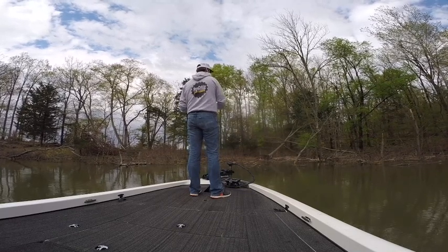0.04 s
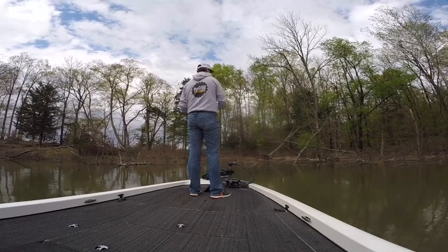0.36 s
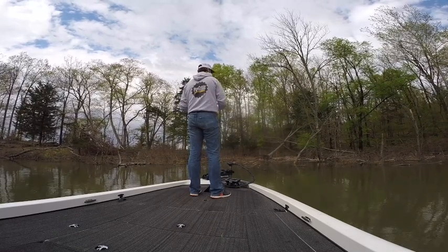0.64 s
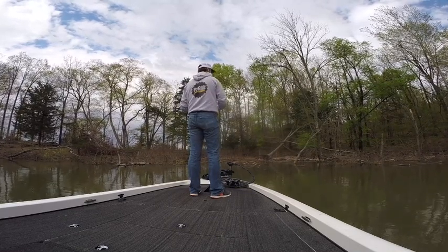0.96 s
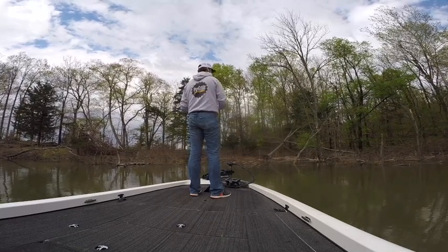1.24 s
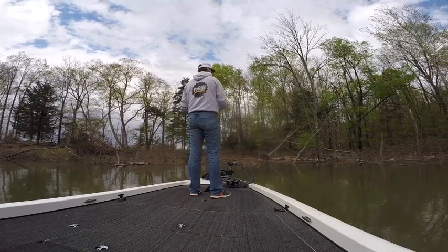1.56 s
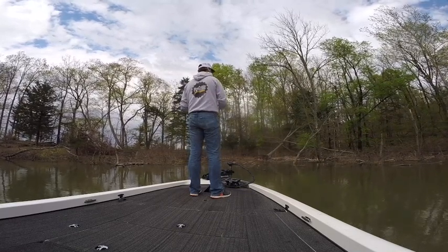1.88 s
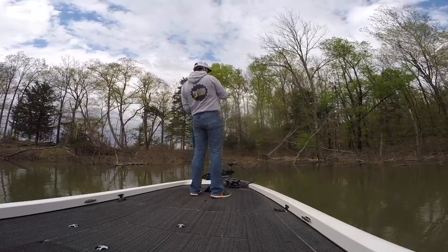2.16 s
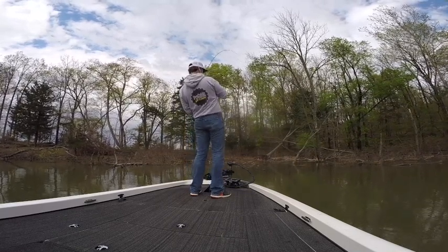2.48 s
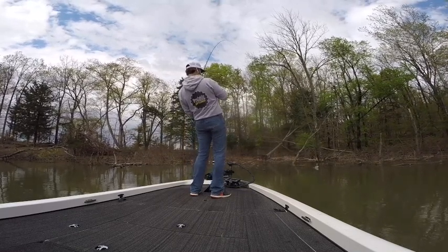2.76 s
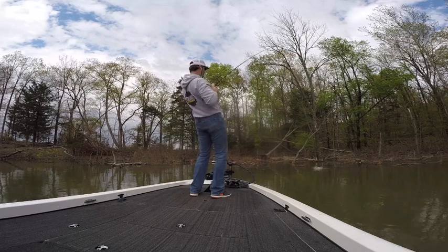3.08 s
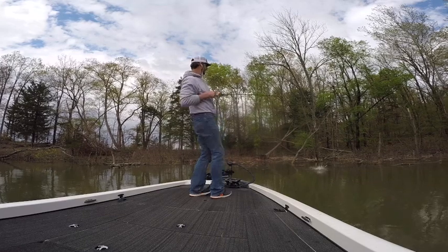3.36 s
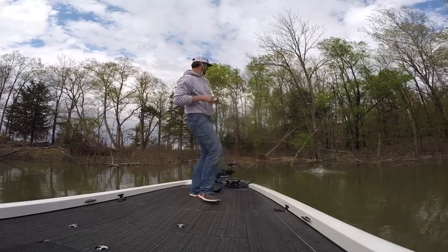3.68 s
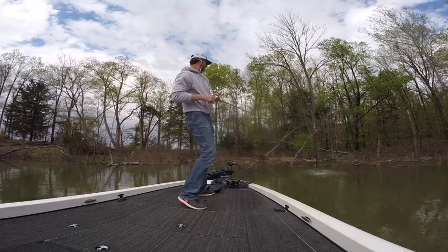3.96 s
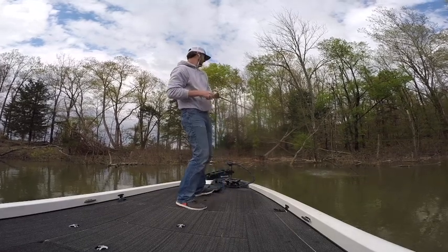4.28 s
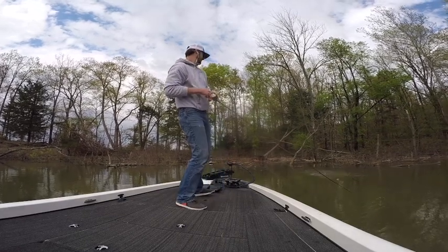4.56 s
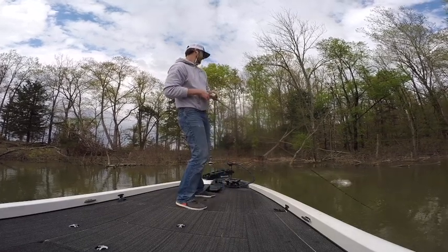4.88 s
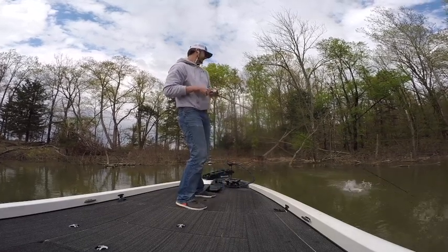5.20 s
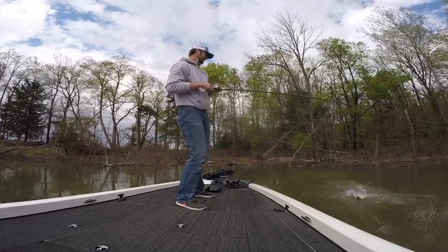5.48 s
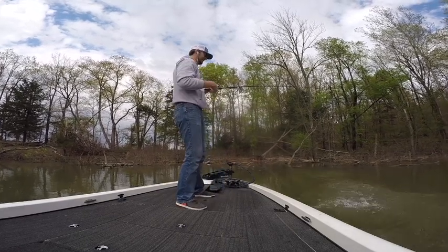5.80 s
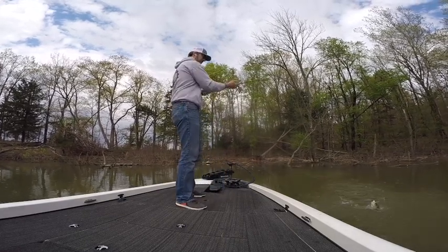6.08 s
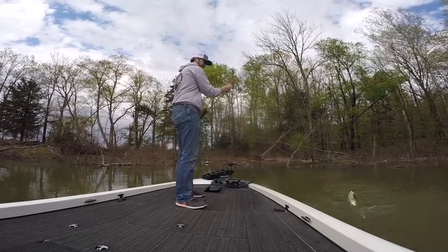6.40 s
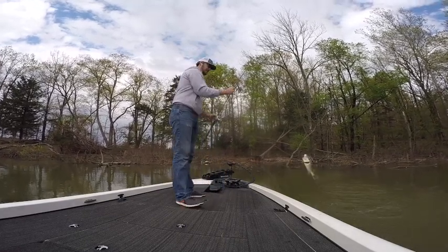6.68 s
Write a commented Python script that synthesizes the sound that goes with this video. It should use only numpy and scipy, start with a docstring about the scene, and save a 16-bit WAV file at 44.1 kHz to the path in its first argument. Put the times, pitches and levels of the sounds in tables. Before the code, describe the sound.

On a quiet lake, wind buffets the microphone with a big low thump and a fading rumble. A bird gives a few faint whistles and another chips raspily. A fishing line zips briefly, then a hooked fish splashes, first farther off and then louder beside the boat. Tackle ticks and rings thinly throughout the fight, and is sharpest at the end as the fish comes out dripping.

```python
"""A hooked fish thrashes on a calm lake in two spells, far off and then beside the boat, and is swung
out dripping. Its impacts on the water radiate broadband noise, and the air they trap rings as bubbles.
The line zips tight and the tackle ticks and rings in thin, high modes. Wind buffets the microphone
with a low rumble and one big thump, and feet thud on the deck. On the wooded shore, which returns
faint echoes of the water, one bird whistles and another gives raspy chips."""
import sys
import numpy as np
from scipy import signal
from scipy.fft import rfft, irfft, next_fast_len
from scipy.io import wavfile
from scipy.ndimage import uniform_filter1d

SR = 44100
rng = np.random.default_rng(int(sys.argv[2]) if len(sys.argv) > 2 else 0)


def generate_wav(signal):
    """Clip the signal to [-1, 1] and save it as 16-bit WAV at the path in sys.argv[1]."""
    frames = np.transpose(np.atleast_2d(signal))
    scaled = np.clip(frames, -1, 1) * 32767
    pcm = np.round(scaled).astype(np.int16)
    wavfile.write(sys.argv[1], SR, pcm)


N = 305921
TIME = np.arange(N) / SR

# wind turbulence at the microphone: frequency_hz, density_db
WIND_SPECTRUM = [(14, -12), (22, -1), (32, 1.5), (50, -3.5), (85, -13), (112, -22.5), (165, -37.5),
                 (200, -40), (250, -54), (500, -53.5), (1100, -74)]
# gusts: start_s, hold_s, level_db
GUSTS = [(0.168, 0.058, -15), (0.432, 0.082, -26.5), (0.857, 0.012, -24.5), (0.983, 0.058, -22.5),
         (1.238, 0.11, -24.5), (1.451, 0.17, -29), (2.239, 0.011, -34), (2.825, 0.28, -31.5),
         (3.23, 0.74, -41), (4.374, 0.015, -38.5), (4.55, 0.25, -42.5), (5.66, 0.029, -33.5),
         (5.883, 0.023, -35), (6.34, 0.72, -40.5)]
# rumble around the hull: frequency_hz, density_db
HULL_SPECTRUM = [(40, -9), (60, -7.5), (82, 4), (120, -8), (175, -13), (240, -28.5), (400, -33)]
# air in the trees: frequency_hz, density_db; then its overall level
TREE_SPECTRUM, TREE_DB = [(150, -29), (250, 2.5), (308, -2.5), (624, -7.5), (2160, -11), (2760, -13),
                          (3010, -11.5), (6310, -16.5), (15500, -25.5)], -59
# thumps of wind and of feet on the deck: start_s, level_db, pitch_hz, length_s
THUMPS = [(0.189, -4.5, 32.4, 0.14), (0.18, -16.5, 75.5, 0.043), (0.257, -13, 111, 0.025),
          (0.253, -30.5, 196, 0.038), (1.19, -39, 130, .05), (0.3, -4.5, 70, 0.03),
          (1.279, -15.5, 55, 0.05), (1.68, -18.5, 39, 0.072), (2.925, -27.5, 74, 0.092),
          (3.058, -17.5, 41.5, 0.097), (3.539, -32, 69.6, 0.11), (3.887, -26.5, 117, 0.026),
          (3.898, -28, 54.6, 0.029), (5.702, -32, 82, 0.09)]
# one bird's raspy chips: start_s, length_s, pitch_hz, level_db
BIRD_CHIPS = [(1.385, .04, 7300, -65), (2.049, 0.027, 6360, -55.5), (2.051, 0.051, 4900, -59)]
# the other bird's whistles: start_s, length_s, top_hz, level_db
BIRD_NOTES = [(1.6, 0.1, 2580, -63), (1.79, 0.11, 2830, -53.5), (2.003, 0.11, 2840, -52.5),
              (2.224, 0.1, 2824, -52.5), (2.437, 0.11, 2840, -53.5)]
# glide of the tightening line: time_s, pitch_hz, level_db
LINE_GLIDE = [(2.7, 4300, -59), (2.71, 5800, -52), (2.72, 6600, -51), (2.75, 6770, -67), (2.8, 6700, -65)]
# bouts of thrashing: start_s, rise_s, hold_s, t60_s, splash_db, churn_re_splash_db, spray_re_splash_db
BOUTS = [(2.787, 0.018, 0.35, 0.72, -50, -7, -9.5), (2.9, 0.38, .2, 1.0, -41.5, -6, -8),
         (3.544, 0.091, 0.37, 1, -44, -7, -8), (4.634, 0.094, 0.26, .8, -49, -14.5, -7.5),
         (4.828, .12, 0.49, 1.04, -39, -12.5, -4), (5.553, 0.046, 0.26, 0.74, -41.5, -5, -3),
         (6.076, 0.033, .08, 0.84, -45.5, -20, -10)]
# torn water: frequency_hz, density_db
SPLASH_SPECTRUM = [(82, -34), (140, -4), (200, -0.5), (243, -8), (456, -2), (747, -13), (1040, 3.5),
                   (1500, 0), (1900, 5.5), (2580, -3.5), (3500, -5.5), (5040, -12), (14600, -28),
                   (15500, -36)]
# body and tail strike the water: start_s, snap_db, cavity_hz, treble_db
SLAPS = [(2.798, -38.5, 1150, 0), (3.013, -29, 1940, -10), (3.076, -34, 1090, 11.5),
         (3.122, -30.5, 1180, 6), (3.241, -31, 1127, 12), (3.254, -25, 2180, 10.5),
         (3.406, -23.5, 1760, -15), (3.421, -22.5, 1100, -21), (3.55, -27.5, 2850, 13),
         (3.629, -25.5, 970, 3), (3.768, -30.5, 1040, 3), (3.786, -20, 1800, -18), (4.885, -25, 2130, 6.5),
         (4.957, -22, 1810, 6), (4.977, -18.5, 2080, -3), (5.003, -18.5, 1910, -15), (5.104, -22, 3100, 6),
         (5.146, -22.5, 1970, 10), (5.205, -18.5, 1260, 7), (5.264, -23.5, 2120, 0), (5.278, -20, 1480, 9),
         (5.332, -14.5, 2000, 0), (5.351, -30, 2990, 5), (5.442, -19.5, 1670, -10), (5.454, -23, 2000, -2),
         (5.481, -26, 2030, -15), (5.615, -21.5, 2380, 9), (5.649, -25.5, 2130, -9),
         (5.739, -24, 2420, 7.5), (5.832, -26.5, 1110, -10), (5.845, -22.5, 1050, -1),
         (6.167, -30, 1200, -8)]
# large air pockets: start_s, level_db, pitch_hz
AIR_POCKETS = [(2.852, -36, 500), (3.148, -29, 820), (3.271, -28, 326), (3.295, -27, 530),
               (3.338, -28, 430), (3.482, -25, 487), (3.691, -27.5, 454), (3.761, -30.5, 306),
               (3.861, -28.5, 614), (3.888, -24.5, 427), (3.909, -27, 313), (3.943, -33, 400),
               (4.536, -42, 394), (4.989, -24, 592), (5.109, -31, 428), (5.391, -23.5, 970),
               (5.404, -30, 354), (5.491, -30.5, 560), (5.653, -33, 470), (5.709, -29.5, 352),
               (5.833, -28.5, 437), (5.855, -26.5, 500), (5.989, -42, 316), (6.166, -29.5, 850),
               (6.281, -39, 424), (6.408, -38.5, 343), (6.496, -38, 756), (6.582, -34, 335)]
# single falling drops: start_s, level_db, nominal_hz
DRIPS = [(3.5752, -31, 2130), (4.133, -42, 5300), (4.181, -42, 4400), (4.217, -42.5, 3530),
         (4.711, -37, 1460), (5.4031, -27, 1610), (6.091, -40, 1570), (6.117, -35, 2680),
         (6.146, -38.5, 1157), (6.2213, -40, 1720), (6.2398, -43, 1035), (6.367, -39, 2700),
         (6.3798, -37.5, 2500)]
# ticks of the tackle: start_s, click_db, low_ring_db, middle_ring_db, high_ring_db, t60_s
TACKLE_TICKS = [(2.8546, -25, -35.5, -39, -50, 0.1), (2.9104, -24, -38.5, -50, -48, 0.42),
                (3.251, -26, -45, -51, -50, 0.16), (3.3436, -32, -36, -46, -45, 0.14),
                (3.5503, -8.5, -26, -37, -43, 0.031), (4.287, -32, -66, -62, -61, .15),
                (4.663, -28.5, -67, -42.5, -52, 0.1), (4.7294, -25, -30, -29.5, -35, 0.16),
                (4.879, -20, -32.5, -36, -41, 0.22), (5.145, -10, -47, -46, -43, 0.45),
                (5.295, -32, -50, -41, -51, 0.15), (5.3335, -12, -38, -37, -37, 0.15),
                (5.48, -32, -41, -34.5, -39, 0.1), (5.5157, -31, -40, -42.5, -47, 0.24),
                (6.191, -26, -49, -44.5, -47, 0.28), (6.256, -33, -41.5, -47, -60, 0.55),
                (6.293, -30, -56, -47, -54, 0.19), (6.353, -24.5, -52, -56, -57, 0.25),
                (6.47, -38, -65, -64, -53, 0.15), (6.4988, -32, -60, -39.5, -58, 0.17),
                (6.601, -37, -62, -49.5, -49, 0.63), (6.6497, -8, -22, -19, -22, 0.2),
                (6.694, -29, -47, -29, -37, 0.094), (6.7052, -19, -45, -23.5, -34, 0.064),
                (6.7336, -18, -42, -17.5, -22, 0.1), (6.7807, -9, -16.5, -28, -27, 0.29),
                (6.8117, -15, -24.5, -36, -38, 0.34), (6.9246, -35, -36, -40, -29.5, .16)]
# normal modes of the tackle: pitch_hz, level_db, t60_ratio
TACKLE_MODES = [(5370, -14, .45), (6520, -16, .4), (6715, 0, 1.2), (6810, -14, 1.2), (7760, -19, .7),
                (9560, -8, .6), (9800, 0, .7), (9900, -11, .6), (13000, -2, .7), (13620, -10, .6),
                (14050, -10, .6), (14350, -6, .5)]
# drops landing on the lake: frequency_hz, band_level_db
PATTER_SPECTRUM = [(400, -9.5), (1000, 0.5), (2500, 3.5), (5000, 10.5), (9000, -8), (15000, -9)]
# reflections from the shore: delay_s, gain_db
SHORE_ECHOES = [(.075, -21), (.17, -22)]

BREEZE_DB = -43.5   # wind strength in a lull
RING_CENTRES_HZ = (6740, 9800, 13500)   # the tackle's low, middle and high ring


def from_db(db):
    """Amplitude grows tenfold every 20 dB."""
    return 10 ** (np.asarray(db) / 20)


def rms_one(x):
    """Normalisation to unit mean power."""
    return x / np.sqrt(np.mean(x ** 2) + 1e-20)


def at_hz(points, hz):
    """Interpolation of a spectrum on a log-frequency axis."""
    f, db = np.transpose(points)
    return np.interp(np.log(hz), np.log(f), db)


def band(x, low_hz, high_hz):
    """A Butterworth band-pass with gentle slopes."""
    sos = signal.butter(2, [low_hz, min(high_hz, .45 * SR)], "band", fs=SR, output="sos")
    return signal.sosfilt(sos, x + 1e-18)


def drift(rate_hz):
    """Low-passed noise wanders smoothly, with rms 1."""
    step, run_in = 40, 2000
    pole = np.exp(-2 * np.pi * step * rate_hz / SR)
    white = rng.standard_normal(N // step + run_in + 2)
    slow = signal.lfilter([1], [1, -2 * pole, pole * pole], white)[run_in:]
    return np.interp(np.arange(N) / step, np.arange(len(slow)), rms_one(slow))


def coloured_noise(spectrum):
    """Spectral weighting colours white noise; the result has rms 1."""
    size = next_fast_len(N)
    hz = np.maximum(np.fft.rfftfreq(size, 1 / SR), 1)
    inside = (hz >= spectrum[0][0]) & (hz <= spectrum[-1][0])
    weights = from_db(at_hz(spectrum, hz)) * inside
    return rms_one(irfft(rfft(rng.standard_normal(size)) * weights, size)[:N])


def add(out, start_s, sound):
    """Superposition: a sound sums into the mix from start_s on."""
    at = int(np.clip(round(start_s * SR), 0, N))
    out[at:at + len(sound)] += sound[:N - at]


def decay(t, t60_s):
    """Exponential damping, by 60 dB in t60_s."""
    return np.exp(-np.log(1000) * t / max(t60_s, 1e-4))


def swell(start_s, rise_s, hold_s, t60_s):
    """An envelope of linear rise, hold and exponential decay."""
    t = TIME - start_s
    return np.clip(t / rise_s, 0, 1) * decay(np.maximum(t - rise_s - hold_s, 0), t60_s)


def wind_strength():
    """Incoherent gusts add in power to a steady breeze."""
    gusts = [from_db(db) * swell(start_s, rise_s=0.063, hold_s=hold_s, t60_s=0.63)
             for start_s, hold_s, db in GUSTS]
    return np.sqrt(from_db(BREEZE_DB) ** 2 + np.sum(np.square(gusts), axis=0))


def wind(strength, smoothing_s=0.0666, ceiling_db=-15):
    """Turbulent pressure at the microphone: low noise that follows the gusts up to a ceiling."""
    eddies = coloured_noise(WIND_SPECTRUM)
    local_power = uniform_filter1d(eddies ** 2, int(smoothing_s * SR))
    return eddies / np.sqrt(local_power + 0.019) * np.minimum(strength, from_db(ceiling_db))


def hull_rumble(strength, calm_db=-45.5, flutter_db=-40):
    """Flow noise follows power laws: the hull's drone grows slowly with wind, a rough flutter steeply."""
    drone = from_db(calm_db) * (strength / from_db(BREEZE_DB)) ** 0.15 * coloured_noise(HULL_SPECTRUM)
    flutter = coloured_noise([(90, -1.5), (200, 1), (400, -21.5), (1000, -38), (6000, -40)])
    return drone + from_db(flutter_db) * (strength / strength.max()) ** 3 * flutter


def air_in_trees():
    """Air flowing through the trees radiates steady broadband noise."""
    return from_db(TREE_DB) * coloured_noise(TREE_SPECTRUM)


def thumps():
    """Wind and footfalls give pressure pulses, each a few windowed cycles of a low tone."""
    out = np.zeros(N)
    for start_s, db, hz, length_s in THUMPS:
        t = TIME[:int(length_s * SR)]
        add(out, start_s, from_db(db) * np.sin(2 * np.pi * hz * t) * np.hanning(len(t)) ** 0.87)
    return out


def bird_chips():
    """Short bursts of high, narrow-band noise are heard as a rasp with a vague pitch."""
    out = np.zeros(N)
    for start_s, length_s, hz, db in BIRD_CHIPS:
        n = int(length_s * SR)
        hiss = rms_one(band(rng.standard_normal(n), hz * 0.82, hz * 1.03))
        add(out, start_s, from_db(db) * np.hanning(n) * hiss)
    return out


def bird_whistles(droop=0.1493, scatter_db=-22):
    """Frequency modulation arches each whistle; scattering by the trees adds faint delayed copies."""
    out = np.zeros(N)
    for start_s, length_s, top_hz, db in BIRD_NOTES:
        position = np.linspace(-1, 1, int(length_s * SR))
        arch = 1 - droop * np.abs(position + .08) ** 3
        hz = top_hz * arch * (1 + .013 * drift(250)[:len(position)])
        note = from_db(db) * np.sin(2 * np.pi * np.cumsum(hz) / SR) * (1 - position ** 2) ** 0.57
        add(out, start_s, note)
        for delay_s in rng.uniform(0.0085, 0.29, size=22):
            add(out, start_s + delay_s, from_db(scatter_db) * note)
    return out


def line_zip(octave_db=-2.0):
    """The line's pitch rises with tension; a second harmonic sounds during the steep climb."""
    times_s, pitches_hz, levels_db = np.transpose(LINE_GLIDE)
    hz = np.interp(TIME, times_s, pitches_hz)
    level = from_db(np.interp(TIME, times_s, levels_db)) * (TIME > times_s[0]) * (TIME < times_s[-1])
    phase = 2 * np.pi * np.cumsum(hz * (1 + 0.0086 * drift(300))) / SR
    climbing = hz < pitches_hz[2]
    return level * (np.sin(phase) + from_db(octave_db) * climbing * np.sin(2 * phase))


def thrash_strength(lag_s=0, t60_ratio=1, wake_db=-23, wake_rise_s=0.0084):
    """Bouts and the wake of each slap add in power, giving envelopes of churn, splash and spray."""
    power, wake_power = np.zeros((3, N)), np.zeros(N)
    for start_s, rise_s, hold_s, t60_s, db, churn_db, spray_db in BOUTS:
        gains = from_db([[db + churn_db], [db], [db + spray_db]])
        power += (gains * swell(start_s + lag_s, rise_s, hold_s, t60_s * t60_ratio)) ** 2
    t = TIME[:SR // 2]
    wake = np.clip(t / wake_rise_s, 0, 1) * decay(t, t60_s=0.34)
    for start_s, db, _, _ in SLAPS:
        add(wake_power, start_s + lag_s, (from_db(db + wake_db) * wake) ** 2)
    wake_balance = from_db([[-8.5], [0], [-5]])
    return np.sqrt(power + wake_power * wake_balance ** 2)


def splashing(thrash, impacts_per_s=600, size_db=1.5, clump_db=3.0, flicker_db=2.0, wash=0.45):
    """Shot noise: random droplet impacts in every band come in clumps over a wash of fine bubbles."""
    out, clumps = np.zeros(N), drift(22)
    edges = np.geomspace(160, 16000, 16)
    centres = np.sqrt(edges[1:] * edges[:-1])
    power = from_db(at_hz(SPLASH_SPECTRUM, centres)) ** 2 * np.diff(edges)
    churn, spray = centres < 850, centres >= 3200
    splash = ~churn & ~spray
    core = (centres > 240) & (centres < 6500)   # these bands set the scale of each zone
    for level, trim_db, zone in zip(thrash, (0.0, -1.5, -1.5), (churn, splash, spray)):
        for k in np.flatnonzero(zone):
            hits = rng.random(N) < impacts_per_s * np.sqrt(centres[k] / 2000) / SR
            sizes = from_db(size_db * np.minimum(rng.exponential(1, hits.sum()), 4))
            drops = np.zeros(N)
            drops[hits] = sizes * rng.choice([-1, 1], hits.sum())
            water = band(rms_one(drops) + wash * rng.standard_normal(N), edges[k], edges[k + 1])
            water = rms_one(water * from_db(clump_db * clumps + flicker_db * drift(24.0)))
            out += water * level * from_db(trim_db) * np.sqrt(power[k] / power[zone & core].sum())
    return out


def bubble(hz, cycles, rise):
    """A bubble is a damped oscillator whose pitch rises as it nears the surface."""
    t60_s = cycles / hz
    t = TIME[:int(t60_s * SR) + 2]
    phase = 2 * np.pi * hz * (t + rise * t * t / (2 * t60_s))
    return np.sin(phase) * decay(t, t60_s) * (1 - np.exp(-2 * hz * t))


def small_bubbles(thrash, count=2500, level_db=5.0, spread_db=14.5):
    """Air entrained by the thrashing resonates as many small bubbles, few loud and many faint."""
    out, first = np.zeros(N), int(BOUTS[0][0] * SR)
    for when, pitch, size, life in rng.random((count, 4)):
        at = int(first + when * (N - first))
        hz = 350 * 26 ** (pitch ** .7)
        # big, low bubbles come with the churning, the smallest with the spray
        churn, splash, spray = 20 * np.log10(thrash[:, at] + 1e-9)
        spectrum = [(600, churn), (1100, splash), (2300, splash), (4500, spray + 2), (9000, spray - 6)]
        db = at_hz(spectrum, hz) + level_db + spread_db * (size ** 3 - 0.72)
        add(out, at / SR, from_db(db) * bubble(hz, cycles=14 + 26 * life, rise=.25))
    return out


def slaps(crackle_db=-12.0, cavity_db=0.5, bright_db=-6.0):
    """An impact on water gives a sharp snap, a crackle and a brief resonance of the cavity it opens."""
    out, t = np.zeros(N), TIME[:SR // 5]
    for start_s, db, hz, treble_db in SLAPS:
        white = rng.standard_normal((3, len(t)))
        body, spray, snap = np.sign(white) * np.abs(white) ** 1.72   # the power makes the noise spiky
        crackle = rms_one(band(body, hz * .5, hz * 1.13))
        crackle += from_db(treble_db + bright_db) * rms_one(band(spray, 1500, 6200))
        add(out, start_s, from_db(db + crackle_db) * crackle * decay(t, t60_s=0.11))
        snap = band(snap, hz * .5, hz * 2.2) * decay(t, t60_s=.016)
        add(out, start_s, from_db(db) * snap / np.abs(snap).max())
        add(out, start_s, from_db(db + cavity_db) * bubble(hz, cycles=26, rise=.1))
    return out


def plops_and_drips(pocket_db=-1.0, plunge_db=-11.0, drip_db=6.5):
    """Resonance falls with bubble size: air pockets gulp amid a dull plunge, and drops plink higher."""
    out, t = np.zeros(N), TIME[:SR // 4]
    for start_s, db, hz in AIR_POCKETS:
        add(out, start_s, from_db(db + pocket_db) * bubble(hz, cycles=18.7, rise=0.17))
        plunge = rms_one(band(rng.standard_normal(len(t)), hz * 0.49, hz * 1.65))
        add(out, start_s, from_db(db + plunge_db) * plunge * decay(t, t60_s=0.15))
    for start_s, db, hz in DRIPS:
        add(out, start_s, from_db(db + drip_db) * bubble(hz * .96, cycles=43, rise=0.3))
    return out


def tackle(ring_db=-1.5, click_trim_db=-11.0, buzz_db=-16.5, sag=0.0129, sag_s=0.0233, detune=0.003):
    """Each contact clicks and excites damped metallic modes, which sag in pitch as the tension eases."""
    out, t = np.zeros(N), TIME[:SR // 2]
    bent_time = np.cumsum(1 + sag * (np.exp(-t / sag_s) - .5)) / SR
    shake = drift(80)
    attack = 1 - np.exp(-t / 0.00036)
    gaps_s = np.diff([tick[0] for tick in TACKLE_TICKS], append=N / SR)
    for (start_s, click_db, *rings_db, t60_s), gap_s in zip(TACKLE_TICKS, gaps_s):
        white = rng.standard_normal((2, len(t)))
        click = rms_one(band(white[0], 3340, 10000)) * decay(t, t60_s=0.0092)
        add(out, start_s, from_db(click_db + click_trim_db) * click)
        # loose parts chatter against each other while they ring
        buzz = rms_one(band(white[1], 3300, 11000)) * decay(t, t60_s * 0.61)
        ring = from_db(max(rings_db) + buzz_db) * buzz
        for hz, db, t60_ratio in TACKLE_MODES:
            phase, place, tuning = rng.random(3)
            gain = from_db(db + ring_db + np.interp(hz, RING_CENTRES_HZ, rings_db))
            mode_hz = hz * (1 + detune * (2 * tuning - 1))
            mode = np.sin(2 * np.pi * (mode_hz * bent_time + phase)) * decay(t, t60_s * t60_ratio)
            offset = int(place * (N - len(t)))
            tremolo = 1 + 0.55 * shake[offset:offset + len(t)]
            ring += gain * mode * tremolo
        choke = decay(np.maximum(t - gap_s, 0), t60_s=0.23)   # the next contact damps the ring
        add(out, start_s, ring * attack * choke)
    return out


def patter(drops_per_s=330, flight_s=0.11, spray_db=-3.5, lift_s=6.345, lift_rise_s=0.39, lift_db=-50):
    """Drops from the spray and the lifted fish land as random impulses, each with its own spectrum."""
    hits = np.flatnonzero(rng.random(N) < drops_per_s / SR)
    sizes_db = 3.5 * np.minimum(rng.exponential(1, len(hits)), 3.5)
    edges = np.geomspace(350, 15500, 10)
    out, t = np.zeros(N), TIME[:SR // 50]
    for low, high in zip(edges, edges[1:]):
        colour_db = 6.0 * rng.uniform(-0.83, 0.86, len(hits))
        drops = np.zeros(N)
        drops[hits] = from_db(sizes_db + colour_db) * rng.choice([-1, 1], len(hits))
        tick = rng.standard_normal(len(t)) * decay(t, t60_s=0.0055)
        ticks = band(signal.fftconvolve(drops, tick)[:N], low, high)
        out += from_db(at_hz(PATTER_SPECTRUM, np.sqrt(low * high))) * rms_one(ticks)
    thrown = from_db(spray_db) * thrash_strength(lag_s=flight_s, t60_ratio=1.7)[2]
    streaming = from_db(lift_db) * np.clip((TIME - lift_s) / lift_rise_s, 0, 1)
    return rms_one(out) * np.hypot(thrown, streaming)


def scene():
    """All sources superpose, and the shore reflects the middle frequencies of the water sounds."""
    thrash, gusts = thrash_strength(), wind_strength()
    water = splashing(thrash) + small_bubbles(thrash) + slaps() + plops_and_drips() + patter()
    ambience = air_in_trees() + hull_rumble(gusts) + bird_whistles() + bird_chips()
    out = water + wind(gusts) + thumps() + tackle() + line_zip() + ambience
    for delay_s, db in SHORE_ECHOES:
        add(out, delay_s, from_db(db) * band(water, 520, 5900))
    return out[None]


def record(dry):
    """An elliptic low-pass cuts the highest treble steeply."""
    cutoff_hz = 15150
    return signal.sosfilt(signal.ellip(10, .1, 80, cutoff_hz, fs=SR, output="sos"), dry)


dry = scene()
out = record(dry)
generate_wav(out)
```